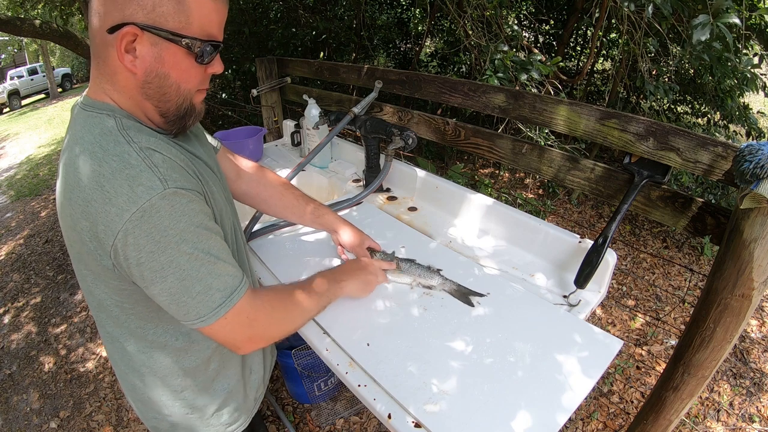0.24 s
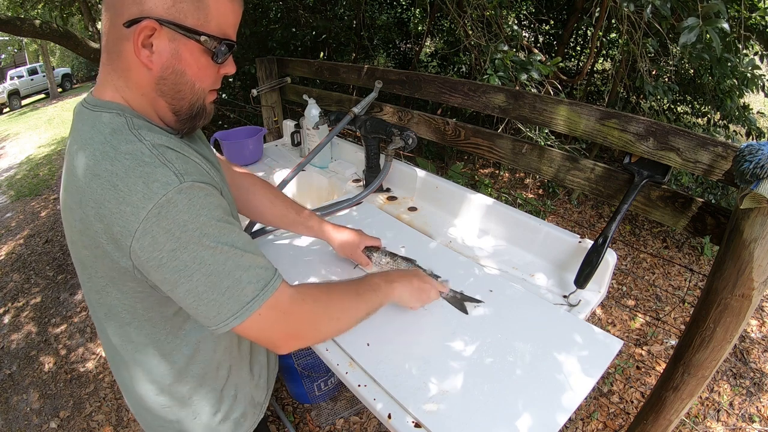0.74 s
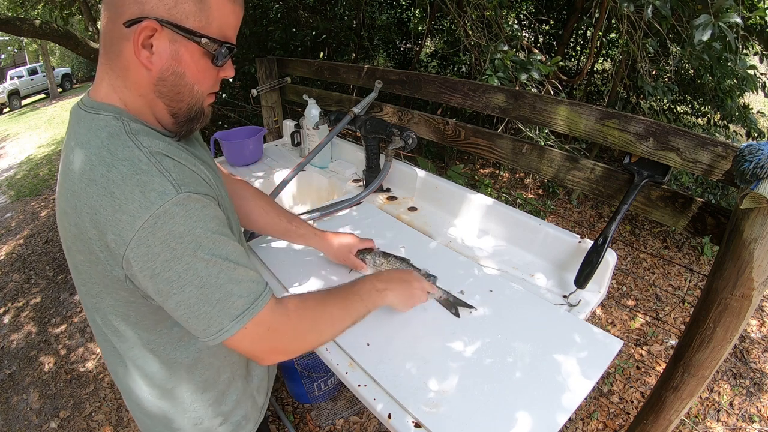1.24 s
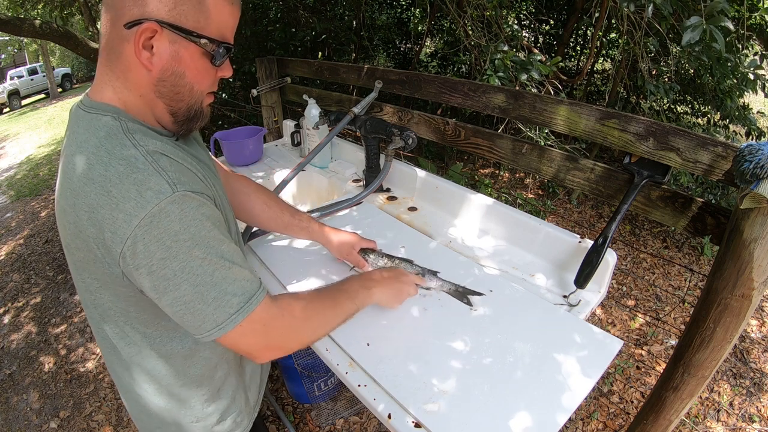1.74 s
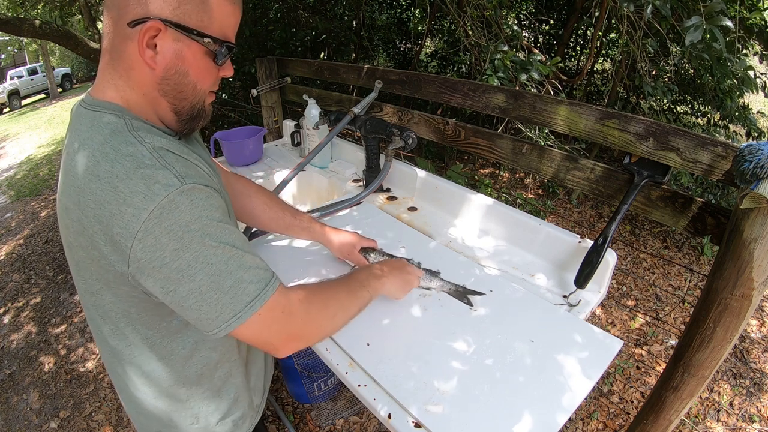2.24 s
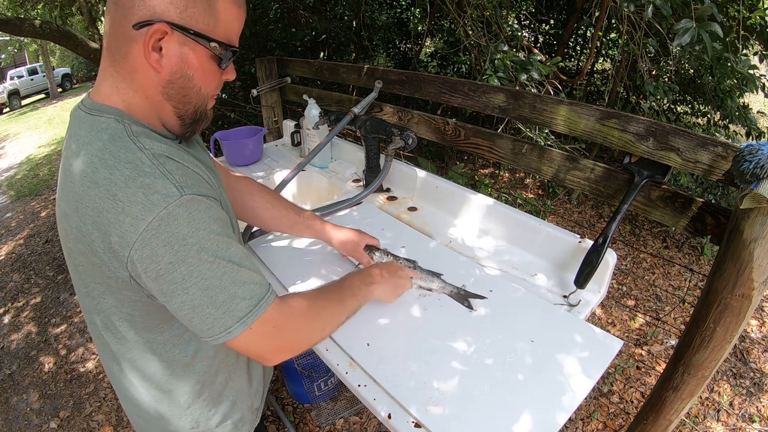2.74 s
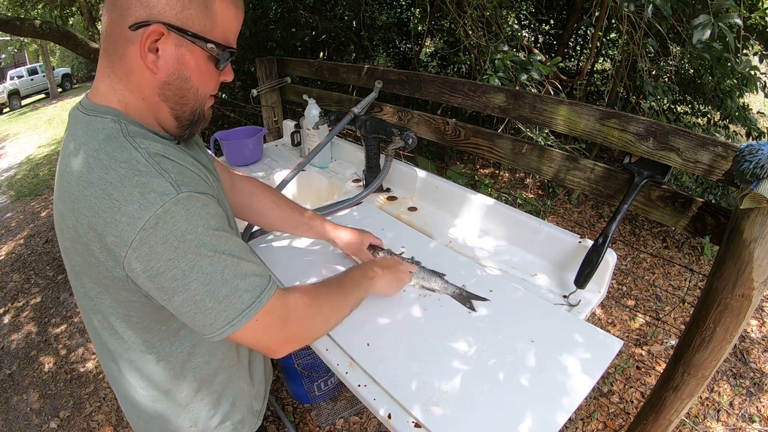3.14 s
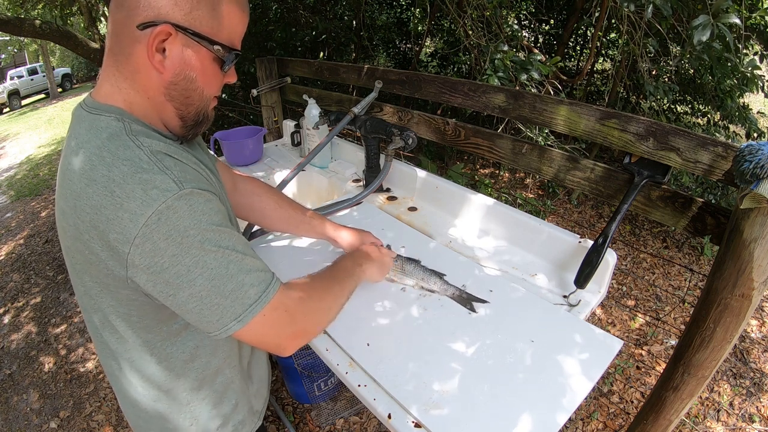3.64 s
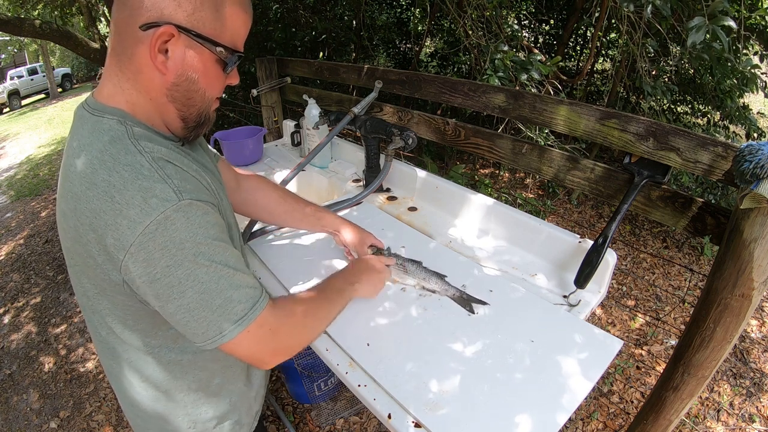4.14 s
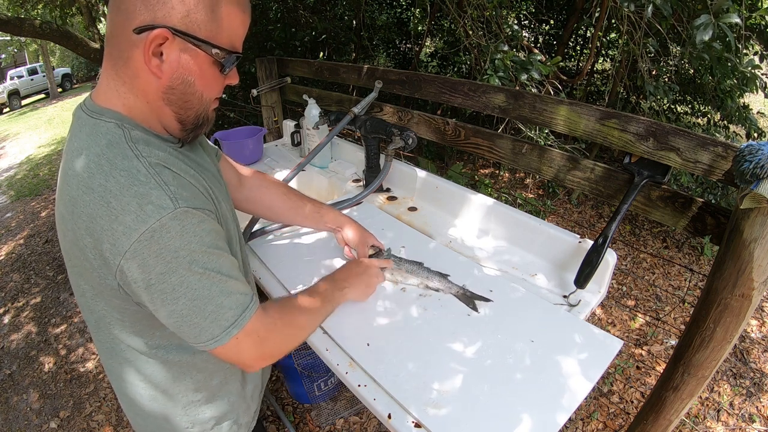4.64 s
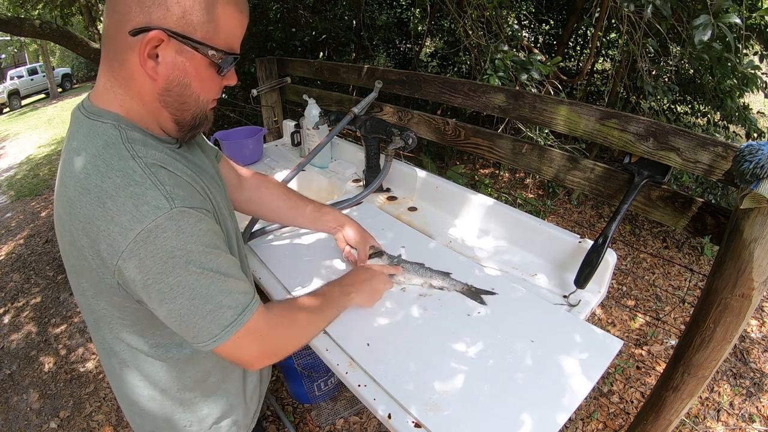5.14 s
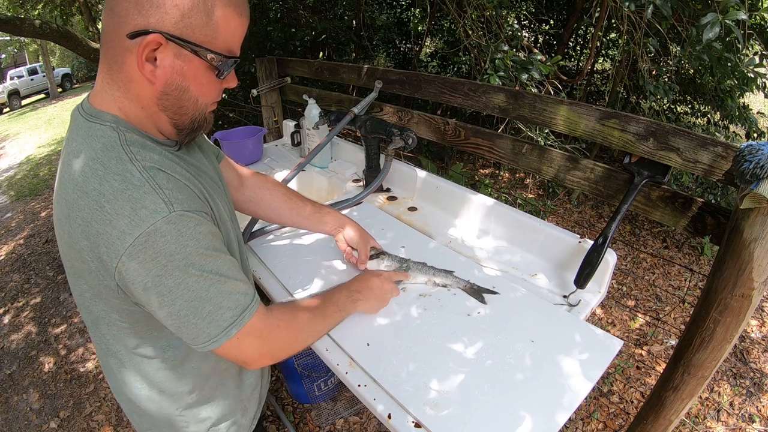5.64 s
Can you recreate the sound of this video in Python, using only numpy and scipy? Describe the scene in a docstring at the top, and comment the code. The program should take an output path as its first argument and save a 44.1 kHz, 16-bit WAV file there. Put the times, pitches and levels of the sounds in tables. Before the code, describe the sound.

Outdoors at a cleaning table, a hand tool rasps rapidly over fish scales. The first two strokes are strongest, with heavy bumps; a few knocks follow around one second, then steady gritty scrapes with sharp ticks and brief metallic rings. Soft fish slaps and table thuds come in between. Sparse bird chirps become busier late, above quiet distant rumble and breeze. Close stereo pickup, nearly dry.

```python
"""Outdoors, at a plastic cleaning table: a fish is scaled, about four strokes/s with light return drags.
Scraping is random catch impulses, shaped by stroke force, exciting crackle, blade rings and table thud.
Single impulses with a short crumble make the snaps, bites, jolts, knocks, slaps and bumps.
Behind are songbirds (gliding sines) and an outdoor rumble with leaf hiss and breeze (shaped noise)."""
import sys
import numpy as np
from scipy import signal
from scipy.fft import rfft, irfft, next_fast_len
from scipy.io import wavfile
from scipy.ndimage import uniform_filter1d, map_coordinates

SR = 44100
rng = np.random.default_rng(int(sys.argv[2]) if len(sys.argv) > 2 else 0)


def pcm_store(signal):
    """Save signal as 16-bit PCM."""
    levels = np.round(np.clip(np.atleast_2d(signal), -1, 1) * 32767)
    wavfile.write(sys.argv[1], SR, levels.astype(np.int16).T)


N = 259556
T = np.arange(N) / SR
PADDED = 2 * next_fast_len(N // 2 + SR // 4, True)
FREQS = np.maximum(np.fft.rfftfreq(PADDED, 1 / SR), 1)
SIDES = np.array([[1], [-1]])  # left, right

# Table levels are relative: mix gains follow.


def undb(db):
    """Decibels to gain."""
    return 10 ** (np.asarray(db) / 20)


def curve(points):
    """Spectrum table in dB, interpolated over log frequency."""
    hz, db = np.transpose(points)
    return np.interp(np.log(FREQS), np.log(hz), db)


def follow(table, times):
    """Columns of a time table, interpolated at the given times."""
    s, *columns = np.transpose(table)
    return [np.interp(times, s, column) for column in columns]


def unit(response):
    """Scale a response to preserve white-noise power."""
    return response / np.sqrt(np.mean(abs(response) ** 2))


def colour(points):
    """Minimum-phase response: the real cepstrum folded onto positive time."""
    cepstrum = irfft(np.log(undb(curve(points))))
    cepstrum[1:PADDED // 2] *= 2
    cepstrum[PADDED // 2 + 1:] = 0
    return unit(np.exp(rfft(cepstrum)))


def modes(table):
    """Sum of damped resonators; neighbours swing in opposite senses."""
    total = 0
    for k, (hz, width_hz, db) in enumerate(table):
        resonator = 1 / (1 + 1j * (FREQS ** 2 - hz ** 2) / (FREQS * width_hz))
        total = total + (-1) ** k * undb(db) * resonator
    return unit(total)


def through(x, response):
    """Filter a sound by a frequency response."""
    return irfft(rfft(x, PADDED) * response)[..., :N]


def walk(rate_hz):
    """Smooth random wobble with a spread near 1."""
    k = max(int(SR / rate_hz), 1)
    steps = np.repeat(rng.standard_normal(N // k + 1), k)
    return 1.17 * uniform_filter1d(steps, k)[:N]


# left-right difference over the sum: f/Hz, level/dB
WIDTH_DB = [(100, -14.5), (300, -15), (700, -4), (2000, -10), (3800, -18), (5500, -6), (7800, -6.5),
            (9100, 3.5), (10500, -8.5), (13000, -10)]


def at_ports(force, response):
    """Two microphone ports: random-sign impulses form the side signal, which differs per port."""
    side_force = force * rng.choice([-1, 1], N)
    side = through(side_force, response * undb(curve(WIDTH_DB)))
    return through(force, response) + SIDES * side


# outdoor noise spectrum: f/Hz, level/dB per Hz
OUTDOORS_SPECTRUM = [(20, 0), (45, -5), (63, 3), (76, -8), (90, 3), (115, -9.5), (200, -11), (500, -21.5),
                     (1000, -25.5), (3000, -30), (8000, -40), (11000, -47), (15000, -72)]
# slow course of the rumble: t/s, level/dB
RUMBLE_DB = [(0, -49), (.35, -46), (1.1, -55), (1.45, -51.5), (2.7, -54), (3.2, -50), (3.9, -56),
             (4.15, -51.5), (4.85, -57), (5.2, -52.5), (5.89, -58)]


def outdoors(level_db=2.0, breeze_db=-7, hiss_db=-53.0):
    """Distant rumble and leaf hiss split from one noise spectrum; breeze independent at each port."""
    swell = undb(follow(RUMBLE_DB, T)[0] + 2.3 * walk(rate_hz=9))
    bass = 1 / (1 + (FREQS / 170) ** 4)
    spectrum = colour(OUTDOORS_SPECTRUM)
    rumble = at_ports(rng.standard_normal(N) * swell, spectrum * bass)
    flutter = undb(1.3 * walk(rate_hz=9))
    hiss = at_ports(rng.standard_normal(N) * flutter, spectrum * (1 - bass))
    breeze_spectrum = colour([(15, -3.0), (35, -7), (100, -22), (1000, -76)])
    breeze = through(rng.standard_normal((2, N)), breeze_spectrum)
    gusts = swell * undb(breeze_db + 3 * walk(rate_hz=4) + SIDES * 3.5)
    return undb(level_db) * rumble + undb(hiss_db) * hiss + gusts * breeze


# whistled notes: t/s, length/s, first f/Hz, last f/Hz, level/dB, burr depth/Hz
BIRD_NOTES = [(0.112, 0.064, 2050, 2250, -48, 30), (0.227, 0.03, 2800, 2930, -41.5, 139),
              (1.348, 0.15, 3400, 2710, -58.5, 132), (1.39, 0.23, 7000, 6060, -63, 400),
              (2.002, 0.065, 5700, 4380, -52.5, 130), (2.229, .03, 3670, 2400, -59, 30),
              (2.46, 0.018, 3970, 2800, -48, 40), (2.57, 0.11, 7500, 7680, -57.5, 400),
              (2.638, 0.029, 2390, 1506, -45.5, 35), (2.899, 0.059, 2455, 2796, -43, 60),
              (2.942, 0.052, 2790, 2686, -39, 170), (3.138, 0.078, 1490, 1420, -53.5, 0),
              (3.76, 0.06, 2020, 1885, -47.5, 0), (3.879, 0.041, 2034, 1960, -46.5, 0),
              (4.067, 0.052, 2153, 1843, -42.5, -5), (4.277, .04, 2490, 2610, -56, 60),
              (4.326, .025, 2900, 2880, -55, 125.5), (4.351, 0.062, 2160, 1920, -44.5, 10),
              (4.473, 0.041, 2057, 1900, -44.5, -2), (5.139, 0.067, 2720, 2020, -47, 10),
              (5.183, 0.075, 2020, 1806, -43.5, 82), (5.311, 0.036, 2900, 2736, -43, 0),
              (5.341, 0.016, 2650, 3050, -49, -2), (5.375, 0.0144, 3500, 2310, -47, -3),
              (5.476, .067, 2920, 2195, -45, 10), (5.556, 0.048, 1970, 1770, -43.5, 101),
              (5.663, 0.0506, 2900, 2647, -40, 8), (5.712, 0.015, 2550, 3430, -38.5, 0),
              (5.741, 0.023, 3380, 2240, -51, 3), (5.85, 0.028, 2980, 2610, -45, -6)]
GLIDE_POWER = 1.8  # fast slide first, then settling on the last pitch
BURR_HZ, BURR_AT_HZ, BURR_POWER = 84.7, 2743, 1.3  # burr rate at the reference pitch; faster above it


def birds(waver=0.018):
    """Near-pure whistles: sines gliding between two pitches, some with a fast FM burr."""
    song = np.zeros(N + SR)
    unsteady = 1 + waver * np.resize(walk(rate_hz=200), N + SR)
    for s, length_s, first_hz, last_hz, db, burr_depth_hz in BIRD_NOTES:
        u = np.linspace(0, 1, int(length_s * SR))
        span = slice(int(s * SR), int(s * SR) + len(u))
        glide_hz = last_hz + (first_hz - last_hz) * (1 - u) ** GLIDE_POWER
        burr_hz = BURR_HZ * (last_hz / BURR_AT_HZ) ** BURR_POWER
        burr = burr_depth_hz * np.sin(2 * np.pi * burr_hz * length_s * u)
        hz = glide_hz * unsteady[span] + burr
        envelope = abs(np.sin(np.pi * u)) ** 0.3
        whistle = np.sin(2 * np.pi * np.cumsum(hz) / SR)
        song[span] += undb(db) * np.sqrt(2) * envelope * whistle
    return song[:N] * undb(SIDES * -.6)


def echoes(x, t60_s, wet_db, dull_hz, thin_hz):
    """Diffuse scatter from fence and foliage: decaying noise per port; long waves pass through them."""
    tail = rng.standard_normal((2, N)) * undb(-60 * T / t60_s) * (T > .004)
    tail /= np.sqrt(np.sum(tail ** 2, axis=1, keepdims=True))
    low_pass = 1 / (1 + 1j * FREQS / dull_hz)
    high_pass = 1 / (1 + thin_hz / (1j * FREQS))
    return undb(wet_db) * through(x, rfft(tail, PADDED) * low_pass * high_pass)


def blows(events, response, crumble_db, crumble_s):
    """One impulse per event plus a decaying noise crumble, through a peak-normalised response."""
    force, age = np.zeros(N + SR), T[:SR // 20]
    for s, db in events:
        burst = undb(crumble_db) * rng.standard_normal(len(age)) * np.exp(-age / crumble_s)
        burst[0] = 1
        force[int(s * SR):int(s * SR) + len(age)] += undb(db) * burst
    return at_ports(force[:N], response / abs(irfft(response)).max())


# heavy pushes: t/s, level/dB
BUMPS = [(.052, -34), (.072, -32.5), (.305, -32.5), (.345, -40), (4.19, -43.5), (4.44, -40.5),
         (5.825, -38.5)]
# table-top flexing modes: f/Hz, width/Hz, level/dB
TABLE_FLEX_MODES = [(96, 21, -3), (168, 37, -1), (300, 66, -6)]


def bumps():
    """Heavy pushes flex the table top at its low modes."""
    return undb(-0.5) * blows(BUMPS, modes(TABLE_FLEX_MODES), crumble_db=-33, crumble_s=0.007)


# soft slaps of the fish: t/s, level/dB
SLAPS = [(.306, -31.5), (2.34, -39.5), (2.904, -42), (3.298, -37.5), (3.738, -32), (4.707, -40)]
# table modes: f/Hz, width/Hz, level/dB
TABLE_MODES = [(282, 103, -2.5), (378, 44.4, 3.5), (542.5, 107, -5.5), (632, 65, -3)]


def slaps():
    """The fish slaps softly, ringing the table modes."""
    return undb(-2.0) * blows(SLAPS, modes(TABLE_MODES), crumble_db=-33.0, crumble_s=0.0045)


# tool against table: t/s, level/dB
KNOCKS = [(0.823, -32), (0.845, -35.5), (0.866, -32.5), (0.948, -51), (1.032, -32)]
# modes rung by a knock: f/Hz, width/Hz, level/dB
KNOCK_MODES = [(767, 130, 1), (1080, 160, 0.5), (1190, 115, 2.5), (1770, 134, -1), (3490, 76, 2)]


def knocks():
    """The tool knocks against the table, exciting hard, short modes."""
    return undb(2.5) * blows(KNOCKS, modes(KNOCK_MODES), crumble_db=-23, crumble_s=0.007)


# edge hangs on a scale, then jumps free: t/s, level/dB
JOLTS = [(.0603, -23.5), (.8649, -24), (1.0864, -22.5), (1.0964, -27), (1.292, -28), (2.1015, -31),
         (3.5425, -26), (3.5548, -24), (3.7354, -22.5), (4.9684, -25), (5.2784, -26.5)]
# upper blade modes: f/Hz, width/Hz, level/dB
BLADE_HIGH_MODES = [(1330, 120, -22), (3030, 197, -2), (3326, 60, 5.5), (3467, 82, 6), (3780, 185, -3)]


def jolts():
    """The edge jumps free of a scale, ringing the blade's upper modes."""
    return undb(-3) * blows(JOLTS, modes(BLADE_HIGH_MODES), crumble_db=-18, crumble_s=0.0031)


# hard landings of the edge: t/s, level/dB
BITES = [(.7535, -38), (1.503, -27), (1.5544, -17), (1.6132, -21), (1.833, -26.5), (2.2612, -22),
         (2.4792, -26), (2.6738, -25.5), (2.6873, -23.5), (3.2834, -31.5), (4.4158, -20.5), (4.6713, -29),
         (4.9444, -27)]
# lower blade modes: f/Hz, width/Hz, level/dB
BLADE_LOW_MODES = [(1847, 42, 4), (1985, 66, 9), (2795, 74, -4), (3514, 127, -10.5)]


def bites():
    """The edge lands hard on the scales, ringing the blade's lower modes."""
    return undb(-6.0) * blows(BITES, modes(BLADE_LOW_MODES), crumble_db=-26, crumble_s=0.01)


# stiff scales tearing loose: t/s, level/dB
SNAPS = [(.0425, -16), (.0514, -17), (.0654, -38), (.3104, -24), (.4903, -33), (.5604, -39), (.6814, -24.5),
         (1.2964, -13), (1.3992, -33), (1.5514, -18), (1.8905, -25), (2.1018, -38), (2.3436, -30),
         (2.7344, -20), (2.9186, -15.5), (3.1163, -27.5), (3.2962, -18), (3.3393, -12.5), (3.9345, -23),
         (4.1904, -23.5), (4.4158, -20.5), (4.4465, -22.5), (4.7313, -21), (4.9828, -22), (5.0195, -24),
         (5.5335, -19), (5.5526, -16.5), (5.8305, -17.5)]
# snap spectrum: f/Hz, level/dB per Hz
SNAP_SPECTRUM = [(300, 4), (900, -2.5), (2000, 3), (3800, 6.5), (7000, 5.5), (10000, -12), (12000, -12),
                 (16000, -46)]


def snaps():
    """Stiff scales tear loose: broadband impulses with a short crumble."""
    return undb(-3.5) * blows(SNAPS, colour(SNAP_SPECTRUM), crumble_db=-12.5, crumble_s=0.0018)


# scraping strokes: start t/s, length/s, crest level/dB
STROKES = [(0.028, 0.074, -35), (0.261, 0.077, -34.5), (0.597, 0.099, -44), (0.844, 0.071, -38),
           (1.072, 0.055, -41.5), (1.272, 0.059, -37), (1.494, 0.04, -41.5), (1.546, 0.13, -42),
           (1.836, 0.091, -42), (2.061, 0.076, -41), (2.263, 0.088, -43), (2.473, 0.085, -42.5),
           (2.681, 0.072, -42), (2.871, 0.087, -46.5), (3.073, 0.075, -42), (3.286, 0.084, -42.5),
           (3.506, 0.078, -47), (3.712, 0.057, -46.5), (3.92, 0.076, -49.5), (4.153, 0.084, -41.5),
           (4.392, 0.087, -39), (4.657, 0.095, -37.5), (4.931, 0.073, -44), (5.23, 0.074, -41),
           (5.512, 0.075, -42.5), (5.774, .084, -43.5)]
# light return drags: start t/s, crest level/dB
DRAGS = [(0, -55), (.125, -48.5), (0.367, -51.5), (0.441, -60), (0.509, -60.5), (0.751, -52.5), (.965, -62),
         (1.177, -58), (1.701, -56), (1.955, -59), (2.165, -57.5), (2.383, -55), (2.599, -57.5),
         (2.78, -55), (3.185, -54.5), (3.39, -55), (3.615, -58.5), (3.8, -68.5), (4.026, -60.5),
         (4.303, -54), (4.542, -50), (4.81, -59.5), (5.052, -59), (5.42, -60), (5.698, -53)]
CREST_SHARE, RISE_DB, FALL_DB = .56, 13, 12  # crest position within a stroke, swell and ease
USUAL_STROKE_DB, SWELL_DB_PER_DB = -41, 0.84  # harder strokes have a more pointed crest
DRAG_S, DRAG_SWELL_DB = 0.052, 5


def passes():
    """Strokes and drags as (start s, crest s, end s, rise dB, fall dB, level dB)."""
    rows = []
    for s, length_s, db in STROKES:
        pointed_db = SWELL_DB_PER_DB * (db - USUAL_STROKE_DB)
        crest = s + CREST_SHARE * length_s
        rows.append((s, crest, s + length_s, RISE_DB + pointed_db, FALL_DB + pointed_db, db))
    for s, db in DRAGS:
        rows.append((s, s + DRAG_S / 2, s + DRAG_S, DRAG_SWELL_DB, DRAG_SWELL_DB, db))
    return rows


CONTACT_DB = -71  # the edge never quite leaves the skin


def pressure(offset_db, swell=1.0, ease=0.81, bite_s=0.011, release_s=0.063):
    """Force of all passes: the edge bites, swells to a crest, eases and lifts off."""
    power = np.zeros(N)
    for start, crest, end, rise_db, fall_db, db in passes():
        knots = np.sort([start - bite_s, start, crest, end, end + release_s])
        span = slice(max(int(knots[0] * SR), 0), int(knots[-1] * SR))
        shape_db = np.interp(T[span], knots, [-40, -rise_db * swell, 0, -fall_db * ease, -40])
        power[span] += undb(db + shape_db) ** 2
    return np.sqrt(power + undb(CONTACT_DB) ** 2) * undb(offset_db)


def catches(rate_hz, spread_db):
    """Random impulses of the edge catching on scales: many small, a few large; unit power."""
    size = undb(spread_db * np.minimum(rng.exponential(size=N), 3.3))
    x = (rng.random(N) < rate_hz / SR) * size * rng.choice([-1, 1], N)
    return x / x.std()


# crackle spectrum: f/Hz, level/dB per Hz
RASP_SPECTRUM = [(200, -22), (550, -1.5), (900, -5), (1500, 2.5), (2300, -2), (3500, 2.5), (4500, -2.5),
                 (5400, 1), (6000, -6), (6900, 2.5), (8300, -3), (10000, -1.5), (11000, -11.5),
                 (15000, -22)]


def loose_scales(level_db=-14):
    """Single scales flick off during and just after each pass: sparse impulses, slow release."""
    flicks = catches(rate_hz=110, spread_db=2)
    ticks = flicks * pressure(0, swell=0.8, ease=0.55, bite_s=0.012, release_s=0.15)
    return undb(level_db) * at_ports(ticks, colour(RASP_SPECTRUM))


def off_the_rim(x, lag_s=0.0013, sway=0.1146, echo_db=-9):
    """The raised rim mirrors the crackle; the path sways with the hand, moving the comb filter."""
    late_samples = (T - lag_s * (1 + sway * walk(rate_hz=4))) * SR
    mirrored = np.array([map_coordinates(port, [late_samples]) for port in x])
    return (x + undb(echo_db) * mirrored) / np.hypot(1, undb(echo_db))


def detune(x, shift_hz):
    """Single-sideband shift of a ring by a slowly changing number of Hz."""
    analytic = signal.hilbert(x, PADDED)[..., :N]
    return np.real(analytic * np.exp(2j * np.pi * np.cumsum(shift_hz) / SR))


# top blade modes: f/Hz, width/Hz, level/dB
BLADE_TOP_MODES = [(5516, 150, 2.5), (5565, 190, -2), (6960, 120, -18.5), (7050, 280, -6.5), (9260, 92, -9),
                   (10380, 63, -23)]
# ring freedom in the grip, relative to the rasp: t/s, low ring level/dB, high ring level/dB
GRIP_DB = [(.07, 0, 5.5), (.3, 3.5, 0), (.55, 4.5, -0.5), (1.1, -2.5, 8.5), (1.3, .5, 9), (1.52, 8, -1),
           (2.1, 4, 4), (2.3, 8.5, -4), (2.55, 11, -4), (2.73, 3.5, -5.5), (3.34, -0.5, -1), (3.55, 3.5, 4),
           (3.95, -2, 9), (4.19, 1, -4.5), (4.36, -11, 1), (4.97, 5.5, -0.5), (5.28, 2.5, 2.5),
           (5.55, 0.5, -0.5)]
# ring drift as the hand shifts on the blade: t/s, low ring shift f/Hz, high ring shift f/Hz
DRIFT_HZ = [(.07, -55, -40), (1.5, -28, 15), (2.3, 5.5, 61.5), (3.1, 65, 35.5), (4.4, 40, 16.5),
            (5.0, 40, -37), (5.8, 7.5, 25)]
# working place on the fish: t/s, place (0 tail, 1 head)
PLACE = [(.07, 0.54), (.3, 0.53), (.65, 0.038), (.88, 0.42), (1.3, 0.059), (2.3, 0.32), (2.8, .65),
         (3.3, 0.72), (3.65, 0.97), (4.6, 0.52), (5.1, 0.84), (5.8, 0.58)]
THUD_TAIL_DB, THUD_HEAD_DB = -17.5, 0  # the thick head end passes more thud to the table
CRISP_DB_PER_DB = -0.38  # a loosely held blade rings more and cuts less crisply


def scraping():
    """The edge chatters over scale rows; shared catches crackle, ring the blade and shake the table."""
    low_db, high_db = follow(GRIP_DB, T)
    low_shift_hz, high_shift_hz = follow(DRIFT_HZ, T)
    thud_db = THUD_TAIL_DB + (THUD_HEAD_DB - THUD_TAIL_DB) * follow(PLACE, T)[0]
    crisp_db = CRISP_DB_PER_DB * low_db
    rows = unit(undb(2.55 * walk(rate_hz=200)))
    grains = catches(rate_hz=3300, spread_db=2.0) * rows

    rasp = off_the_rim(at_ports(grains * pressure(0), colour(RASP_SPECTRUM)))
    treble = through(rasp, 1 / (1 + (8000 / FREQS) ** 12))
    rasp = rasp + (undb(crisp_db) - 1) * treble

    # low modes ring freely as a stroke begins, choked as it ends
    low_force = grains * pressure(low_db, swell=0.41, ease=1.44, bite_s=0.019, release_s=0.012)
    high_force = grains * pressure(high_db, swell=0.7, ease=1.27, bite_s=0.0087, release_s=0.012)
    low_ring = detune(at_ports(low_force, modes(BLADE_LOW_MODES)), low_shift_hz)
    high_ring = detune(at_ports(high_force, modes(BLADE_HIGH_MODES)), high_shift_hz)
    top_ring = at_ports(high_force, modes(BLADE_TOP_MODES))

    thud_force = grains * pressure(thud_db, swell=0.4, ease=1.0, bite_s=0.01, release_s=0.017)
    thud = at_ports(thud_force, modes(TABLE_MODES))
    rings = undb(-0.54) * low_ring + undb(-1.63) * high_ring + undb(-9.5) * top_ring
    return undb(1.87) * rasp + rings + undb(0.37) * thud


# left minus right: f/Hz, level/dB
BALANCE_DB = [(300, 0), (1000, -1), (1900, -3), (3300, -1), (6000, .5), (9300, -2), (13000, -1.5)]


def scene():
    """Work at the table, a little to the right, with birds and rumble behind."""
    song = birds()
    far = undb(-2) * song + echoes(song, t60_s=0.35, wet_db=-4, dull_hz=6000, thin_hz=506)
    work = bumps() + slaps() + knocks() + jolts() + bites() + snaps() + loose_scales() + scraping()
    work = through(work, undb(SIDES * curve(BALANCE_DB) / 2))
    near = work + echoes(work, t60_s=0.55, wet_db=-17, dull_hz=5000, thin_hz=1670)
    return outdoors() + far + near


def record(dry):
    """The camera cuts the top: a steep elliptic low-pass."""
    top_hz, ripple_db, stop_db = 15500, .2, 70
    low_pass = signal.ellip(8, ripple_db, stop_db, top_hz, fs=SR, output="sos")
    return signal.sosfilt(low_pass, dry)


dry = scene()
out = record(dry)
pcm_store(out)
```